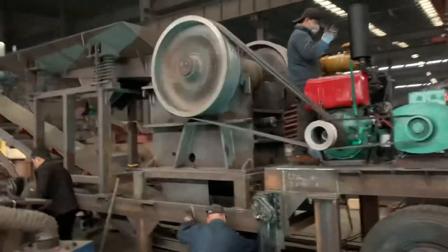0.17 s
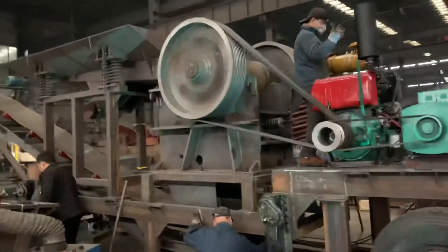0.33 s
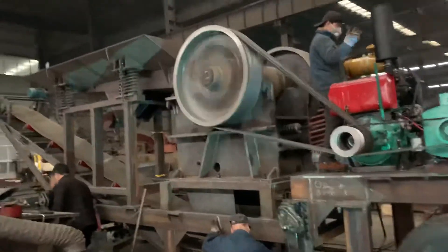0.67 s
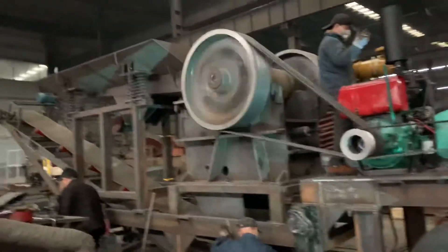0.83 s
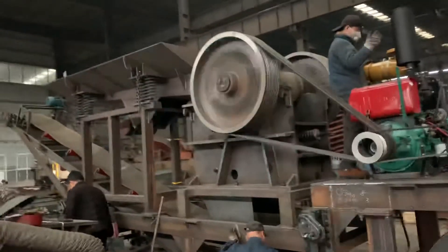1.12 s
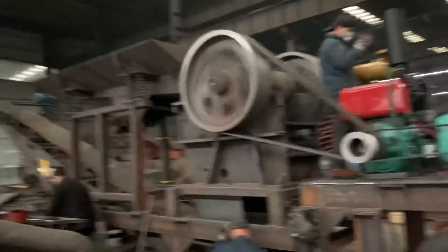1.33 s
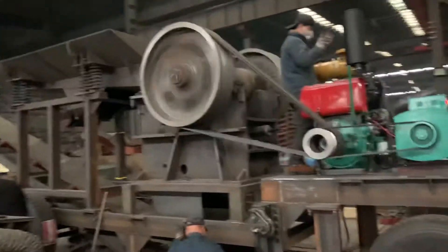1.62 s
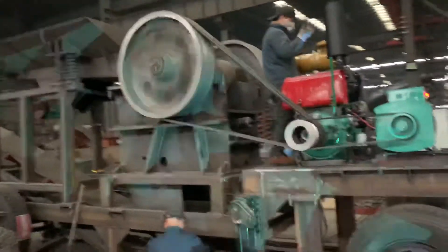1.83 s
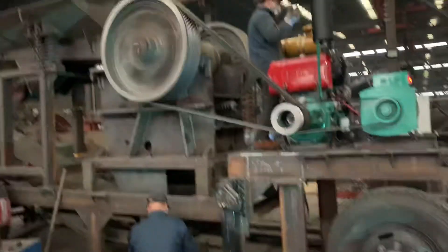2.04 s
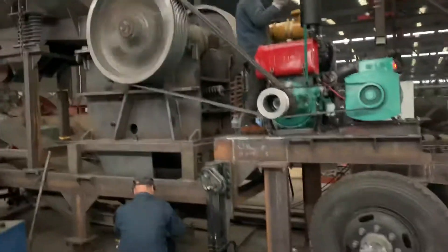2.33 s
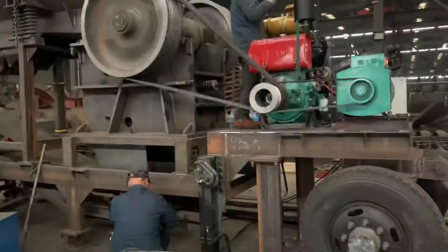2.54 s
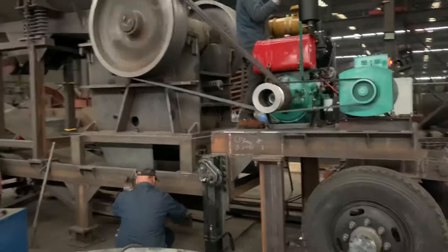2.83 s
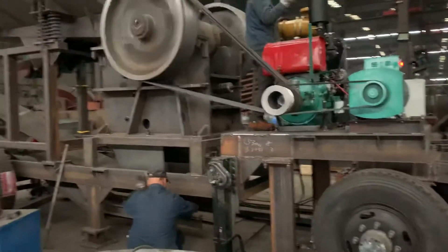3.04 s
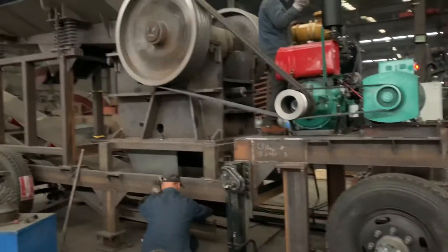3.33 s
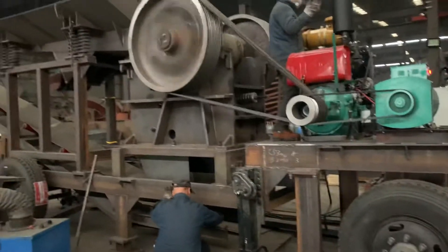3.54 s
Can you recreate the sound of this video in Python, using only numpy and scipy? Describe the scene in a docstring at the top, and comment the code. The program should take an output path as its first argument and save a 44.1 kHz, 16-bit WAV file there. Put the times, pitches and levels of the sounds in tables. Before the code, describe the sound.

Diesel engine chugging fast and driving a jaw crusher, loud steady drone with metallic clatter in a hall

```python
"""A deep throb and a round of metal knocks repeat with each cycle of a single-cylinder diesel engine.
It drives a jaw crusher by belt; partials make the throb, noise bursts the knocks that the hall smears.
Filtered noise is the rush of spinning machinery; sines make a shaft hum, frame thuds and steel pings.
Noise bursts make sharp ticks, as of loose bits of metal, in two spells among random grains of grit."""
import sys
import numpy as np
from scipy import signal
from scipy.fft import rfft, irfft
from scipy.io import wavfile
from scipy.ndimage import uniform_filter1d

SR = 44100
rng = np.random.default_rng(int(sys.argv[2]) if len(sys.argv) > 2 else 0)


def pcm_store(signal):
    """Save signal as 16-bit PCM."""
    levels = np.round(np.clip(np.atleast_2d(signal), -1, 1) * 32767)
    wavfile.write(sys.argv[1], SR, levels.astype(np.int16).T)


N = 162288
CYCLE_HZ = 9.8185  # engine cycles per second


def from_db(db):
    """Turn decibels into an amplitude gain."""
    return 10 ** (np.asarray(db) / 20)


def rms_one(x):
    """Scale to unit power."""
    return x / np.sqrt(np.mean(x ** 2) + 1e-20)


def in_time(rows):
    """Join the points of a time table by straight lines, at every sample."""
    return np.interp(np.arange(N) / SR, *np.transpose(rows))


def per_bin(points):
    """Read a spectrum table at every frequency bin, along log frequency."""
    hz, value = np.transpose(points)
    bin_hz = np.arange(N // 2 + 1) * SR / N
    return np.interp(np.log(bin_hz + 1e-3), np.log(hz), value)


def coloured(x, spectrum):
    """Filter by a spectrum table, keeping the power of white noise."""
    return irfft(rfft(x) * rms_one(from_db(per_bin(spectrum))), N)


def drift(rate_hz):
    """Low-passed noise with spread 1: slow chance."""
    step = 100  # samples between points of the curve
    pole = np.exp(-2 * np.pi * rate_hz * step / SR)
    noise = rng.standard_normal(N // step + 2002)
    slow = signal.lfilter([1], [1, -2 * pole, pole * pole], noise)[2000:]  # settled part
    return np.interp(np.arange(N) / step, np.arange(len(slow)), rms_one(slow))


# Stereo width. Each row: frequency in Hz, side against mid in dB.
SIDE_WIDTH = [(60, -19), (130, -13.5), (290, -15), (640, -9.5), (1400, -3.5), (3100, 0), (6000, 1)]
# Stereo lean. Each row: frequency in Hz, left over right in dB.
LEFT_LEAN = [(110, 0), (380, -0.5), (700, 4.5), (1290, 8), (2380, 4), (4400, 9), (7500, 0.5)]


def placed(pair):
    """Mix two unrelated signals to left and right: alike in the bass, leaning left in the middle."""
    mid, side = rfft(pair)
    width = from_db(per_bin(SIDE_WIDTH))
    sign = np.array([[1], [-1]])  # left, right
    both = (mid + sign * width * side) / np.sqrt(1 + width ** 2)
    lean = from_db(sign * per_bin(LEFT_LEAN) / 2)
    return rms_one(irfft(both * lean, N))


# Tone of the rush. Each row: frequency in Hz, relative density in dB per Hz.
RUSH_SPECTRUM = [(20, -42), (40, -18), (62, -10), (90, -1.5), (135, -1), (180, -4), (340, -4.5), (430, -10),
                 (540, -11), (780, -15), (1300, -16.5), (1550, -19.5), (2200, -20.5), (2700, -22.5),
                 (3700, -29), (5000, -37.5), (6500, -40), (16000, -70)]
# Tone of the thin hiss. Each row: frequency in Hz, relative density in dB per Hz.
HISS_SPECTRUM = [(3000, -31), (5500, -15), (7000, 5), (9000, 2), (11000, -3.5), (14000, 2), (16000, -41)]
RUSH_DB, HISS_DB, RUSH_SURGE_DB = -22.5, -48.5, 0.64
RUSH_PULSE, HISS_PULSE = 0.19, 0.74  # how strongly they swell with the knocks


def rush():
    """Noise of belt, flywheels and exhaust gas under a thin hiss; both swell with the knocks."""
    t = np.arange(N) / SR
    beat = 0
    for s, db in CYCLE_KNOCKS:
        since_knock = (t - s) % (1 / CYCLE_HZ)
        beat = beat + from_db(db) * np.exp(-since_knock / KNOCK_DECAY_S)
    low_noise = rng.standard_normal((2, N)) * (1 + RUSH_PULSE * beat)
    high_noise = rng.standard_normal((2, N)) * (1 + HISS_PULSE * beat)
    low = placed(coloured(low_noise, RUSH_SPECTRUM))
    high = rms_one(coloured(high_noise, HISS_SPECTRUM))
    return from_db(RUSH_DB + RUSH_SURGE_DB * drift(2.0)) * low + from_db(HISS_DB) * high


SHAFT_HZ = 49.75  # turns per second, a little off the engine's beat
# Shaft hum partials. Each row: multiple of the turning rate, relative level in dB.
SHAFT_PARTIALS = [(2, -30.5), (3, -45), (4, -44.5)]
# How the hum moves. Each row: time in seconds, gain in dB.
SHAFT_GAIN = [(0, 2), (.7, 0), (1.5, -0.5), (1.9, 0), (3.0, 3), (3.68, -2.5)]
# Once-a-turn drone of the unbalance. Each row: time in seconds, level in dB rms.
UNBALANCE_DRONE = [(0, -48), (.5, -47), (1.0, -33), (1.8, -41), (2.4, -32), (3.1, -33), (3.68, -48)]


def shaft():
    """A hum that beats slowly against the engine, over a deep drone that comes and goes."""
    turn = 2 * np.pi * SHAFT_HZ * np.arange(N) / SR
    hum = 0
    for multiple, db in SHAFT_PARTIALS:
        hum = hum + from_db(db) * np.sin(round(multiple) * turn + 2 * np.pi * rng.random())
    drone = from_db(in_time(UNBALANCE_DRONE)) * np.sin(turn + 2 * np.pi * rng.random())
    return np.sqrt(2) * (from_db(in_time(SHAFT_GAIN)) * hum + drone)


# Dull thuds of the crusher frame. Each row: start in seconds, level in dB.
FRAME_THUDS = [(.383, -18.5), (1.045, -25), (1.40, -22), (1.455, -21), (1.553, -16.5), (2, -21.5),
               (2.2, -20), (2.441, -20), (2.489, -21), (3.072, -18)]
# Modes of the frame. Each row: frequency in Hz, relative level in dB.
FRAME_MODES = [(232, -1.5), (297, 0.5), (358, 0.5)]
FRAME_T60_S, THUD_ATTACK_S = 0.15, 0.0095


def thuds():
    """Soft, heavy blows set the modes of the crusher frame ringing briefly."""
    t, out = np.arange(SR // 4) / SR, np.zeros(N + SR)
    shape = np.minimum(t / THUD_ATTACK_S, 1) * from_db(-60 * t / FRAME_T60_S)
    for s, db in FRAME_THUDS:
        ring = 0
        for hz, mode_db in FRAME_MODES:
            ring = ring + from_db(mode_db) * np.sin(2 * np.pi * (hz * t + rng.random()))
        start = int(s * SR)
        out[start:start + len(t)] += from_db(db) * shape * ring
    return out[:N]


# Thin pieces of steel that ring once. Each row: start in seconds, pitch in Hz, peak level in dB.
STEEL_PINGS = [(.519, 3100, -33), (.638, 3790, -31.5), (1.227, 4600, -43), (2.845, 3770, -37)]
STEEL_T60_S = 0.1


def pings():
    """Faint metallic rings, each a decaying sine at its own pitch."""
    out = 0
    for s, hz, db in STEEL_PINGS:
        t = np.clip(np.arange(N) / SR - s, 0, 1)  # the sine is silent until its start
        out = out + from_db(db - 60 * t / STEEL_T60_S) * np.sin(2 * np.pi * hz * t)
    return out


# Ticks. Each row: start in seconds, relative level in dB, ring in seconds,
# lower body against that level in dB.
LOOSE_TICKS = [(0.0602, -20, .0004, -20), (0.076, -10, 0.0016, -28), (0.2008, -28, 0.00045, -20),
               (0.2421, -17.5, 0.00054, -15), (.269, -14.5, 0.00085, -26), (0.3143, -20, 0.0012, -14),
               (0.3615, -12, 0.0011, -17.5), (0.398, -12, 0.002, -16), (0.486, -13, 0.0012, -22),
               (.520, -10, 0.0026, -22), (0.6026, -12.5, 0.0039, -10.5), (0.709, -25, 0.0008, -20),
               (.738, -17, 0.001, -20), (.771, -30, 0.00055, -20), (0.8968, -22, 0.00095, -11),
               (0.8995, -18.5, .0012, -21), (1.024, -21, 0.00078, -24), (1.0463, -18, 0.00086, -23),
               (1.0982, -17.5, 0.00097, -24), (1.111, -20, 0.0009, -22), (1.129, -23, .0005, -22),
               (1.157, -18, 0.00058, -20), (1.1943, -10, 0.00069, -32), (1.2304, -15.5, 0.0011, -17),
               (2.0637, -17, .002, -5.5), (2.0659, -8.5, 0.0016, -14.5), (2.1031, -23, .0015, -9),
               (2.267, -28.5, 0.0036, -1.5), (2.298, -29, .002, -20), (2.324, -23, .003, -17),
               (2.366, -21, 0.003, -12), (2.421, -26, .001, -20), (2.4733, -22, 0.0024, -20)]
# Tone of ticks and grit. Each row: frequency in Hz, relative density in dB per Hz.
TICK_SPECTRUM = [(1500, -32), (3200, -14.5), (5500, -19.5), (7000, -7), (7800, -2), (8500, 3.5), (10000, 6),
                 (11500, -3), (13000, -1.5), (15500, -9.5)]
# Tone of the lower tick body. Each row: frequency in Hz, relative density in dB per Hz.
TICK_BODY_SPECTRUM = [(300, -12), (1500, -4), (3100, 7.5), (3900, 5), (4700, 3.5), (5200, 0.5), (5750, 0.5),
                      (7000, 4.5), (10000, -5)]
# Fine gritty rattle. Each row: time in seconds, relative level in dB.
GRIT_LEVEL = [(0, -42), (.3, -48), (.35, -35), (.45, -43), (.56, -41.5), (.72, -39.5), (.83, -48.5),
              (1.0, -43.5), (1.22, -48), (1.35, -50), (2.05, -51), (2.09, -34), (2.14, -42.5), (2.25, -48),
              (2.31, -34), (2.37, -34), (2.43, -44.5), (2.6, -50), (3.68, -51.5)]
TICK_DB, TICK_ATTACK_S, TICK_TAIL_DB, TICK_TAIL_T60_S = -3.5, 0.00063, -14, 0.098
TICK_TYPICAL_RING_S = 0.00073  # longer rings leave stronger tails
GRIT_PER_S, GRIT_DB, GRIT_CLUMP_DB = 4500, -0.5, 1.5


def rattle():
    """Bright noise ticks with a lower body and a brief tail, among clumps of fine random grains."""
    t = np.arange(SR // 4) / SR
    ticks = np.zeros((2, N + SR))  # bright part, lower body
    for s, db, ring_s, body_db in LOOSE_TICKS:
        crack = np.exp(-np.maximum(t - TICK_ATTACK_S, 0) / ring_s)
        tail = from_db(TICK_TAIL_DB - 60 * t / TICK_TAIL_T60_S)
        tail = tail * np.sqrt(ring_s / TICK_TYPICAL_RING_S)
        shape = np.minimum(t / TICK_ATTACK_S, 1) * (crack + tail)
        # the loudest millisecond has unit power
        shape = shape / np.sqrt(uniform_filter1d(shape ** 2, size=SR // 1000).max())
        gains = from_db([[db + TICK_DB], [db + body_db]])
        start = int(s * SR)
        ticks[:, start:start + len(t)] += gains * shape * rng.choice([-1, 1], (2, len(t)))
    grains = (rng.random((2, N)) < GRIT_PER_S / SR) * rng.standard_normal((2, N))
    grit_db = GRIT_DB + in_time(GRIT_LEVEL) + GRIT_CLUMP_DB * drift(50)
    grit = from_db(grit_db) * rms_one(grains)
    bright = coloured(ticks[0, :N] + grit, TICK_SPECTRUM)
    return bright + coloured(ticks[1, :N], TICK_BODY_SPECTRUM)


# Knocks of piston, valves and jaw. Each row: seconds into the cycle, relative level in dB.
CYCLE_KNOCKS = [(.007, -3), (.013, 0), (.033, -0.2), (.041, -3.5), (.058, -2.5), (.069, -1), (.085, -0.5),
                (.094, -0.5)]
# Tone of the knocks. Each row: frequency in Hz, relative density in dB per Hz.
CLATTER_SPECTRUM = [(45, -42), (85, -6), (150, 1.5), (220, -2), (360, -9.5), (450, -5.5), (570, -2.5),
                    (660, -9.5), (780, -5), (870, -12), (1000, -7.5), (1320, -7), (1550, -21), (1750, -13),
                    (2250, -10), (2550, -27.5), (3600, -26), (5000, -34), (16000, -71)]
KNOCK_DECAY_S, KNOCK_SPREAD_DB, KNOCK_JITTER_S = 0.0064, 1.67, 0.00006
HALL_T60_S, HALL_DB, CLATTER_DB = 1.06, -15, -27


def clatter():
    """Each knock has its own noise clang and hall tail, and returns every cycle with varied force."""
    t, out = np.arange(SR) / SR, 0
    shape = np.exp(-t / KNOCK_DECAY_S) + from_db(HALL_DB - 60 * t / HALL_T60_S)
    # begin about a second early so that the hall is already sounding
    cycles = np.arange(-int(CYCLE_HZ), int(N / SR * CYCLE_HZ) + 1) / CYCLE_HZ
    for s, db in CYCLE_KNOCKS:
        late, force = rng.standard_normal((2, len(cycles)))
        blows = np.zeros(N + 2 * SR)
        starts = ((1 + cycles + s + KNOCK_JITTER_S * late) * SR).astype(int)
        blows[starts] = from_db(db + KNOCK_SPREAD_DB * force)
        clang = shape * rng.standard_normal((2, SR))
        out = out + signal.fftconvolve(blows[None], clang, axes=1)[:, SR:SR + N]
    return from_db(CLATTER_DB) * placed(coloured(out, CLATTER_SPECTRUM))


# Exhaust, shaking and machine hum. Each row: multiple of the cycle rate, relative level in dB.
THROB_PARTIALS = [(4, -41.5), (5, -41), (8, -38.5), (10, -39), (12, -29), (14, -37), (15, -36.5),
                  (16, -31.5), (20, -39.5), (32, -41), (36, -42), (37, -40.5), (38, -42), (45, -38.5),
                  (54, -47.5), (56, -44), (60, -41), (66, -44), (72, -44), (81, -42), (97, -45.5),
                  (102, -49.5), (113, -49), (120, -45), (131, -45.5), (138, -45.5), (150, -50.5),
                  (230, -52)]
# How the throb moves. Each row: time in seconds, gain in dB.
THROB_GAIN = [(0, -1.5), (.7, -2), (1.3, -2), (1.8, -.5), (2.5, -1.5), (3.1, 1), (3.5, 0), (3.68, 2)]
THROB_WAVER_DB, THROB_WAVER_RAD = 1.07, 0.27
# the firing thump's place in the cycle, and how far the hall scatters its partials
THUMP_S, THUMP_SMEAR_RAD = 0.039, 1.25


def throb():
    """Partials of the firing and of the turning machinery gather into thumps and waver a little."""
    turn, out = 2 * np.pi * CYCLE_HZ * (np.arange(N) / SR - THUMP_S), 0
    for multiple, db in THROB_PARTIALS:
        scatter = THUMP_SMEAR_RAD * rng.standard_normal()
        phase = round(multiple) * turn + scatter + THROB_WAVER_RAD * drift(2.2)
        level = from_db(db + THROB_WAVER_DB * drift(0.64))
        out = out - np.sqrt(2) * level * np.cos(phase)
    return out * from_db(in_time(THROB_GAIN))


# Heavy and slack firings. Each row: centre in seconds, bass swell (or sag, if negative) in dB.
FIRING_SURGES = [(.089, 4), (.17, -5), (.349, 3), (.435, 0), (0.529, -6), (0.829, -6), (1.059, 3),
                 (1.613, 6.5), (1.668, 0), (1.716, 4), (1.876, 6), (2.129, 5.5), (2.256, 4), (2.51, -17),
                 (2.586, 2), (2.639, 2), (2.867, 5), (3.403, 5), (3.45, 5), (3.51, 6), (3.579, 7)]
SURGE_WIDTH_S, SURGE_BELOW_HZ = 0.0076, 196
SURGE_SAG_DB = -0.26  # between surges


def surging(x):
    """The engine runs unevenly: its bass swells on heavy firings and sags on slack ones."""
    t, hz = np.arange(N) / SR, np.arange(N // 2 + 1) * SR / N
    swell_db = SURGE_SAG_DB
    for s, db in FIRING_SURGES:
        swell_db = swell_db + db * np.exp(-0.5 * ((t - s) / SURGE_WIDTH_S) ** 2)
    bass = irfft(rfft(x) / (1 + (hz / SURGE_BELOW_HZ) ** 8), N)
    return x + (from_db(swell_db) - 1) * bass


# How clatter and rush move together. Each row: time in seconds, gain in dB.
MACHINE_GAIN = [(0, -0.74), (.7, 0), (1.3, 0.5), (2.2, 0.1), (2.9, 0), (3.68, 0.45)]


def scene():
    """Mix the surging machine with the thuds, the loose rattle and the pings."""
    machine = throb() + from_db(in_time(MACHINE_GAIN)) * (clatter() + rush()) + shaft()
    return surging(machine) + thuds() + rattle() + pings()


TREBLE_LAG_S, TREBLE_TURN_RAD, SHARED_ABOVE_HZ = 0.0003175, 1.57, 6300
CUTOFF_HZ = 15800


def record(dry):
    """Both channels share one treble, which reaches the left a little later; the top is cut."""
    hz = np.arange(N // 2 + 1) * SR / N
    left, right = rfft(dry)
    shared = 1 / (1 + (SHARED_ABOVE_HZ / (hz + 1)) ** 16)  # share of power
    lag = np.exp(1j * (TREBLE_TURN_RAD - 2 * np.pi * hz * TREBLE_LAG_S))
    left = np.sqrt(1 - shared) * left + np.sqrt(shared) * right * lag
    top_cut = np.sqrt(1 + (hz / CUTOFF_HZ) ** 160)
    return irfft(np.array([left, right]) / top_cut, N)


dry = scene()
out = record(dry)
pcm_store(out)
```